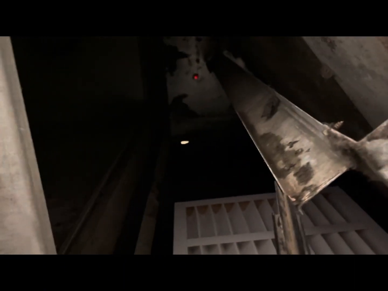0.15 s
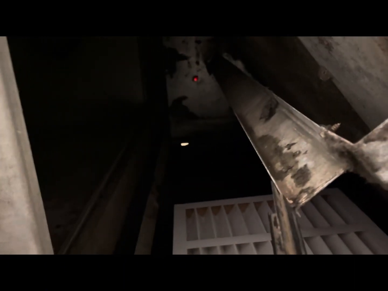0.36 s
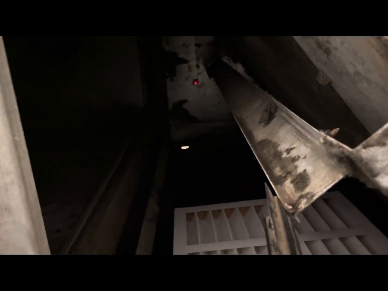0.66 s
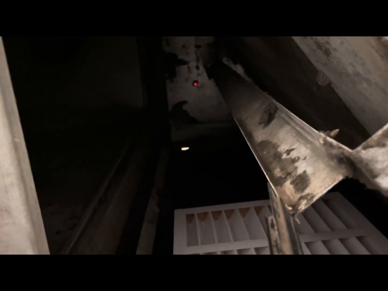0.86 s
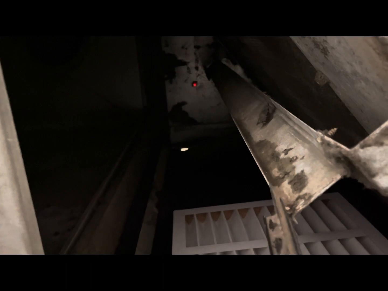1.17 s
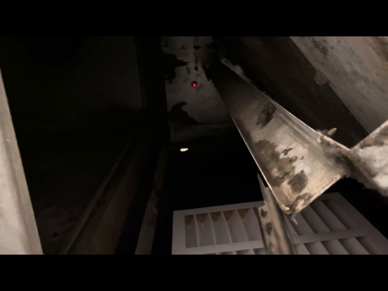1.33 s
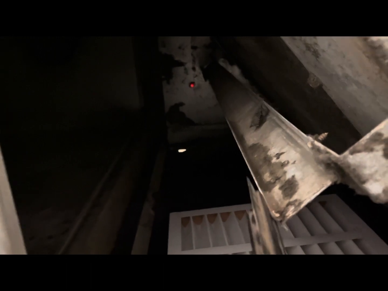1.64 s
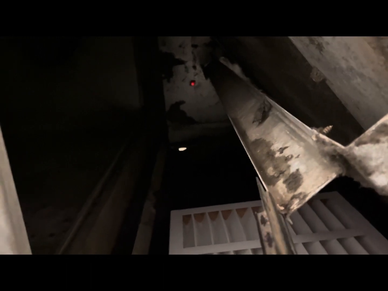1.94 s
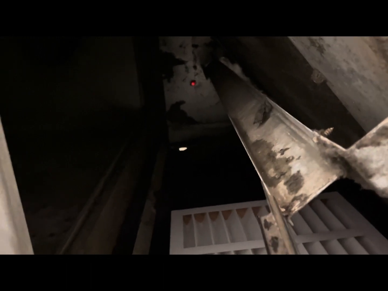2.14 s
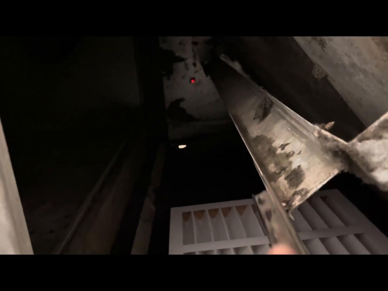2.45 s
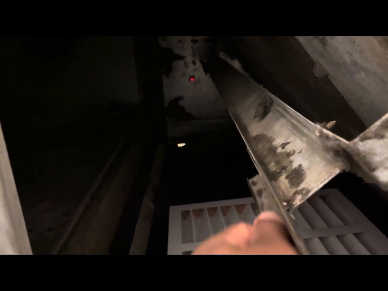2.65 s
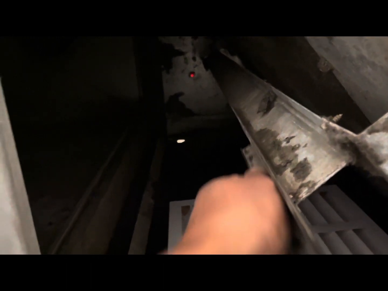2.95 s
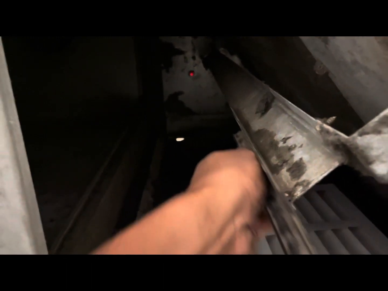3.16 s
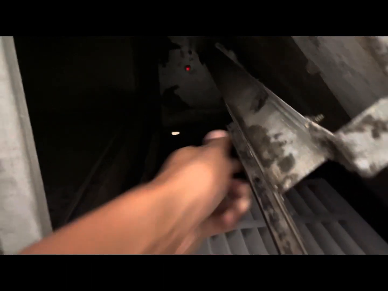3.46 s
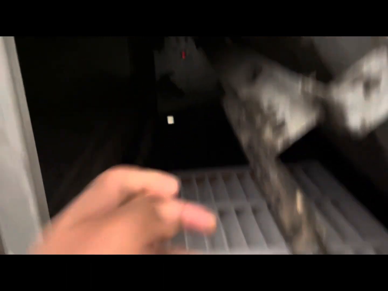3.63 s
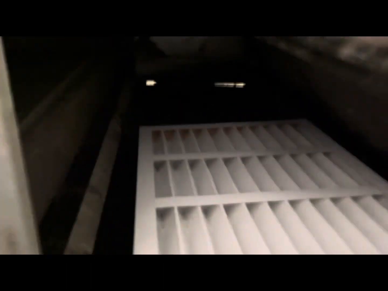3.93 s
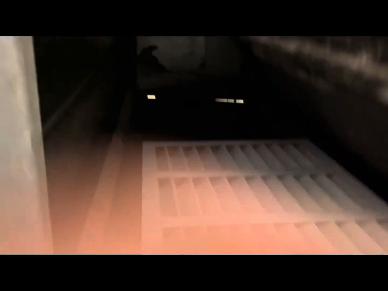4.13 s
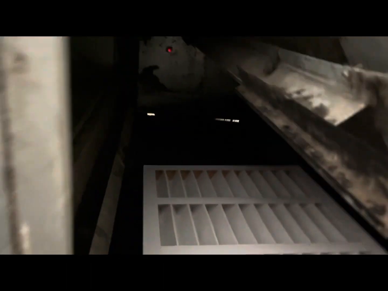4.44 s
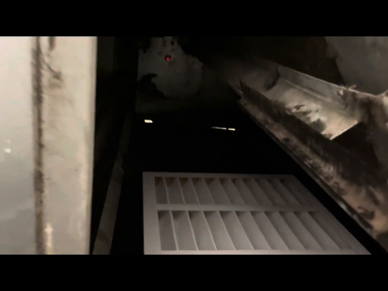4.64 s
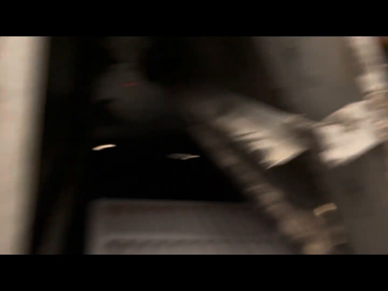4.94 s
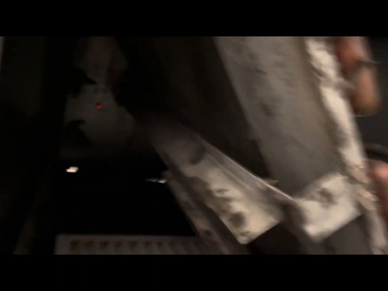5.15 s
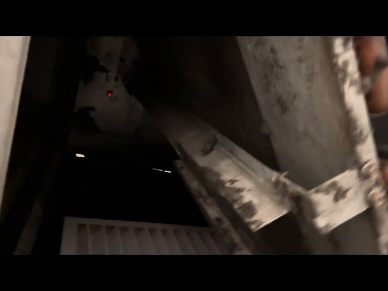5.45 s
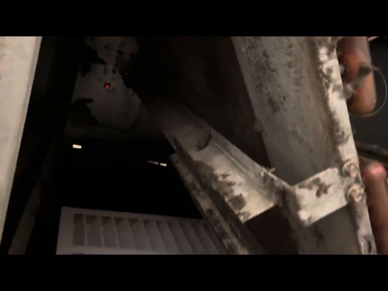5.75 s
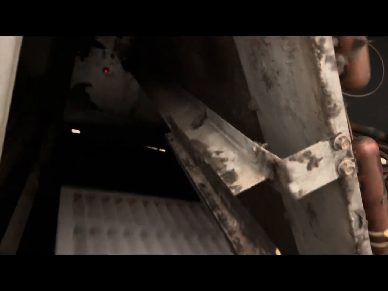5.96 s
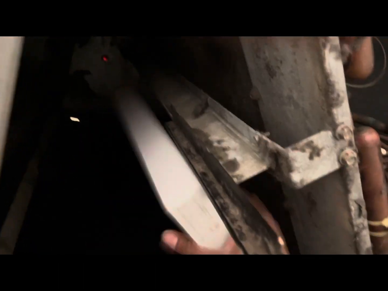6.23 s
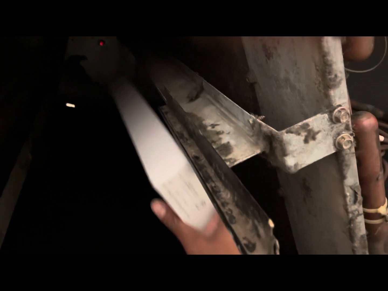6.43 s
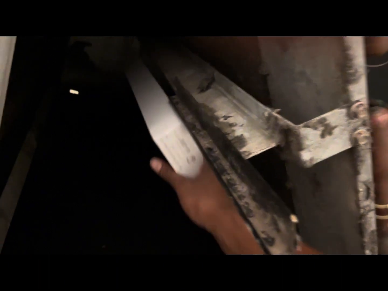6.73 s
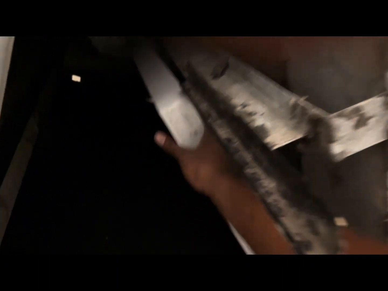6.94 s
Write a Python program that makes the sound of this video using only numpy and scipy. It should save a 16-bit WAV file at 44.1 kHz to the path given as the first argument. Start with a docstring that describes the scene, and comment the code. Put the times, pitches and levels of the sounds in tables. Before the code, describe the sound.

Inside an air-handler cabinet, a deep blower hum and duct rumble run throughout under faint air rush. Light metal scuffs and ticks come first, then a longer gritty drag of a strip on its rail ending near a sharp tick. A boomy thump follows, then a lull, then a filter frame clatters against sheet metal and slides in its track. Close handheld stereo microphone.

```python
"""Filter change in an air-handler cabinet

A hand drags a metal strip along its rail, then lifts a cardboard-framed filter that knocks on the sheet metal.
Knocks ring panel modes, ticks are band noise bursts, and friction is gritty noise through moving rings.
Behind them the blower hums as sine waves on its shaft orders, and duct air is coloured noise: rumble and rush.
A small handheld recorder with two close microphone ports listens."""
import sys
import numpy as np
from scipy import signal
from scipy.fft import rfft, irfft, next_fast_len
from scipy.io import wavfile
from scipy.ndimage import uniform_filter1d

SR = 44100
rng = np.random.default_rng(int(sys.argv[2]) if len(sys.argv) > 2 else 0)


def inscribe(sig):
    """Save sig as 16-bit PCM at rate SR to the path in sys.argv[1].

    A 1-D sig is mono; a 2-D sig holds one channel per row.
    Samples are clipped to [-1, 1] before scaling.
    """
    pcm = np.round(np.clip(np.atleast_2d(sig).T, -1, 1) * 32767)
    wavfile.write(sys.argv[1], SR, pcm.astype(np.int16))


N = 312669
T = np.arange(N) / SR


def amp(db):
    """Amplitude ratio from dB."""
    return 10 ** (np.asarray(db) / 20)


def evened(x):
    """Scales to unit rms."""
    return x / np.sqrt(np.mean(x ** 2) + 1e-20)


def peaked(x):
    """Scales the first field to unit peak."""
    return x / abs(x[0]).max()


def read(points_hz, values, hz):
    """Interpolates a curve along log frequency."""
    return np.interp(np.log(hz + 1), np.log(np.asarray(points_hz) + 1), values)


def coloured(x, spectrum):
    """Shapes x by a spectrum and returns it at unit rms."""
    size = next_fast_len(x.shape[-1])
    gain = amp(read(*np.transpose(spectrum), np.fft.rfftfreq(size, 1 / SR)))
    shaped = irfft(rfft(x, size) * gain, size)
    return evened(shaped[..., :x.shape[-1]])


def bell(hz, centre_hz, octaves):
    """A gain that falls off on both sides of a centre pitch."""
    return np.exp(-.5 * (np.log2((hz + 1) / centre_hz) / octaves) ** 2)


def drift(top_hz):
    """Slow chance curve of unit rms: 16 sines up to top_hz, over the whole scene."""
    hz = np.geomspace(top_hz / 20, top_hz, num=16)
    coarse_s = T[::64]
    waves = np.sin(2 * np.pi * (hz * coarse_s[:, None] + rng.random(16))) / np.sqrt(hz)
    return np.interp(T, coarse_s, evened(waves.sum(1)))


def wander(length, span_s):
    """Chance curve of unit rms that changes over span_s: noise averaged twice."""
    size = round(span_s * SR)
    noise = rng.standard_normal(length + 8820)
    smooth = uniform_filter1d(uniform_filter1d(noise, size), size)
    return evened(smooth)[4410:][:length]


def gritty(length, grit_db):
    """Two unrelated noises sharing one fine and coarse chance level, as in stick and slip."""
    fine = evened(uniform_filter1d(rng.standard_normal(length), size=40))
    coarse = evened(uniform_filter1d(rng.standard_normal(length), size=400))
    return amp(grit_db * (fine + 0.46 * coarse)) * rng.standard_normal((2, length))


def resonate(x, hz, width_hz):
    """A steep resonance of gain 1 that follows the curve hz: shift down, low-pass, shift back."""
    turn = np.exp(2j * np.pi * np.cumsum(hz * np.ones(x.shape[1])) / SR)
    r = np.exp(-np.pi * width_hz / SR)
    slow = signal.lfilter([(1 - r) ** 2], [1, -2 * r, r ** 2], x / turn)
    return 2 * (turn * slow).real


def close_by(pair, share):
    """A nearby source: the right-only field takes a share of the common one and keeps 0.76 of its own."""
    return np.array([pair[0], share * pair[0] + 0.76 * pair[1]])


def add(mix, start_s, sound):
    """Adds a sound into the mix at start_s, cut at the end."""
    part = mix[:, round(start_s * SR):][:, :sound.shape[1]]
    part += sound[:, :part.shape[1]]


def burst(t60_s, echo_db, click):
    """A click in the first field and two fast-dying noises, all faded by a contact plus a cabinet echo."""
    t = np.arange(SR // 8) / SR
    echo = amp(echo_db - 60 * t / .14)
    clicks = click * (t == 0) * [[1], [0]]
    return (clicks + rng.standard_normal((2, len(t)))) * (amp(-60 * t / t60_s) + echo)


# Modes of the cabinet panels and filter frame.
# Each row: pitch in Hz, strength in dB before 1/sqrt(t60), t60 in seconds before damping.
PANEL_MODES = [(81, 6, 0.56), (104, 11, 0.38), (159, 4, 0.12), (228, -1.5, 1), (239.5, -1.5, 0.19),
               (263, 1.5, 0.35), (310.3, 0, 0.4), (343, -1, 0.33), (381, -0.5, 0.28), (434.4, -9, 0.46),
               (462, -2, 0.23), (542, 1, 0.21), (578, 0.5, 0.11), (636, 4, 0.1), (722, -1, 0.11),
               (813, -3, 0.12), (891, 2, 0.26), (1060, 3.5, 0.17), (1150, 5.5, 0.17), (1250, 3, 0.11),
               (1353, 13, 0.031), (1545, 8.5, 0.039), (1600, 14, 0.032), (1780, -9, 0.11),
               (1960, 4.5, 0.063), (2060, -13, 0.067), (2260, -10, 0.16), (2760, 13.5, 0.025),
               (3200, -3, 0.039), (3600, 16, 0.1)]
MODE_SPREAD, NEIGHBOUR_DB = 0.046, -7  # chance detuning as a share of pitch, nearly symmetric


def ring(blow, centre_hz, octaves, damping, buildup_s):
    """A rattling contact drives modes near the struck pitch, each with two weaker neighbours."""
    t = np.arange(SR // 2) / SR
    hz, db, t60_s = np.transpose(PANEL_MODES)[:, :, None]
    fall = bell(hz, centre_hz, octaves) * amp(db - 60 * t / (t60_s * damping)) / np.sqrt(t60_s)
    # two fields, three tones a mode; the main tone is detuned less
    detune = rng.uniform(-1.06, 1, (2, 3, len(PANEL_MODES), 1)) * [[[.2]], [[1]], [[1]]]
    near_hz = hz * (1 + MODE_SPREAD * detune)
    weight = amp([[[0]], [[NEIGHBOUR_DB]], [[NEIGHBOUR_DB]]])
    clusters = (weight * np.sin(2 * np.pi * near_hz * t)).sum(1)
    tones = (fall * clusters).sum(1) * (1 - np.exp(-t / buildup_s))
    return peaked(signal.fftconvolve(blow, tones, axes=1))


# Filter frame and sheet metal knocks; the first three rows are soft, low blows that give body to the strip's
# scuffs. Levels are first-field peaks of each part. Each row: start in seconds, boom in dB, boom pitch in Hz,
# clack in dB, clack pitch in Hz, clack width in octaves, crack in dB, damping factor on the mode t60, contact
# t60 in seconds.
KNOCKS = [(1.335, -46, 392, -40.5, 795, 0.65, -65, 0.22, 0.35),
          (1.43, -46, 350, -40.5, 740, 0.17, -54, 0.14, 0.043),
          (1.686, -46, 600, -45, 1090, 0.34, -67, 0.1, .1),
          (3.937, -21, 109, -29, 650, 0.74, -31, 0.2, 0.048),
          (3.947, -34, 222, -23.5, 484, 0.71, -40, 0.15, 0.014),
          (4.82, -36.5, 227, -45, 600, 0.33, -69, 0.13, 0.065),
          (5.635, -41.5, 210, -33.5, 1410, 0.15, -42, 0.34, 0.07),
          (6.031, -27, 280, -18, 1300, 0.55, -27, 1, 0.032),
          (6.0323, -28.5, 504, -15.5, 590, 0.38, -50, 0.95, 0.032),
          (6.058, -29.5, 303, -30.5, 890, 0.17, -60, 0.64, 0.024),
          (6.081, -30.5, 237, -35, 500, 0.4, -65, 0.45, 0.023),
          (6.116, -32.5, 424, -47, 1500, .8, -58.5, 0.34, 0.18),
          (6.2447, -38, 530, -19, 1900, 0.51, -31, 0.16, 0.044),
          (6.3712, -28.5, 262, -18, 950, 0.83, -40, 0.085, 0.031),
          (6.425, -31, 406, -21, 960, 0.35, -43, 0.1, 0.02),
          (6.516, -36.5, 406, -24.5, 330, 0.4, -62, 0.23, 0.012),
          (6.666, -36.5, 290, -56, 600, 0.49, -49, 0.24, 0.011),
          (6.965, -32, 644, -13.5, 1600, 0.21, -16.5, 0.73, 0.035),
          (6.992, -34.5, 312, -48, 550, 0.3, -65, 0.7, 0.02),
          (7.049, -48, 310, -31, 1500, 0.3, -43, 0.7, .05)]
BOOM_LATE_S, BOOM_SHARE = 0.0059, 0.069
CLACK_EVEN_HZ = 870  # the clack below this is also fed to the right-only field
CRACK_T60_S = .03


def knock(boom_db, boom_hz, clack_db, clack_hz, clack_octaves, crack_db, damping, contact_t60_s):
    """One blow gives a frame clack, a bright crack and a late panel boom nearly unlike in the two fields."""
    blow = burst(contact_t60_s, -10.5, click=11.2)
    boom = ring(blow[[0, 0]], boom_hz, 0.6, damping, 0.014)
    out = amp(clack_db) * ring(blow, clack_hz, clack_octaves, .6 * damping, 0.00042)
    add(out, 0, tick(crack_db, 5100, 1.35, CRACK_T60_S))
    lowpass = signal.butter(N=2, Wn=CLACK_EVEN_HZ, fs=SR, output="sos")
    low = signal.sosfilt(lowpass, out[0])
    out = close_by(out, 0.041) + [[0], [.7]] * low
    add(out, BOOM_LATE_S, amp(boom_db) * close_by(boom, BOOM_SHARE))
    return out


# Small ticks of grit and metal edges.
# Each row: start in seconds, peak in dB, centre in Hz, half width in octaves.
TICKS = [(.246, -46, 11500, .4), (0.667, -39.5, 10400, 0.28), (0.925, -41, 9600, 0.26),
         (1.294, -35, 7000, 0.51), (1.43, -28.5, 3940, 0.4), (1.555, -47, 11000, 0.31),
         (1.679, -43, 3000, 0.8), (1.821, -44.5, 12500, 0.31), (2.006, -34.5, 8000, 2.4),
         (3.148, -18.5, 12600, 1), (3.363, -38, 7000, 3.1), (3.6, -48, 12000, .4), (4.591, -46, 10000, .53),
         (4.734, -40.5, 10000, .6), (5.397, -42.5, 5500, 0.86), (5.458, -46, 11000, .5),
         (6.725, -35.5, 1600, 0.31)]
TICK_T60_S = 0.02


def tick(peak_db, centre_hz, octaves, t60_s):
    """A sharp contact: a burst in one band."""
    edges_hz = np.clip(centre_hz * 2. ** np.array([-octaves, octaves]), 300, 17000)
    band = signal.butter(N=2, Wn=edges_hz, btype="band", fs=SR, output="sos")
    return amp(peak_db) * peaked(signal.sosfilt(band, burst(t60_s, -11.0, click=4.9)))


# Dry sizzle of friction. Each row: frequency in Hz, relative level in dB per Hz.
SIZZLE_SPECTRUM = [(4000, -21.5), (6500, -12.5), (8000, -3.5), (12000, -3.5), (13500, -7), (15000, 4),
                   (16000, -22)]
RING_WANDER, RING_FLICKER_DB = .015, 2  # rms; each ring slides and comes and goes as the grip shifts


def rub(rows, spectrum, grit_db, rings):
    """Gritty friction through restless rings; returns the body and its dry sizzle."""
    s, *columns = np.transpose(rows)
    t = np.arange(s[0], s[-1], 1 / SR)
    level_db, sizzle_db, ring_hz = (np.interp(t, s, c) for c in columns)
    grit = gritty(len(t), grit_db)
    body = coloured(grit, spectrum)
    for multiple, width_hz, db in rings:
        hz = multiple * ring_hz * (1 + RING_WANDER * wander(len(t), 0.034))
        flicker_db = RING_FLICKER_DB * wander(len(t), 0.017)
        body = body + amp(db + flicker_db) * evened(resonate(grit, hz, width_hz))
    fade = np.clip(np.minimum(t - s[0], s[-1] - t) / 0.0016, 0, 1)
    sizzle = amp(level_db + sizzle_db) * coloured(grit, SIZZLE_SPECTRUM) * fade
    return amp(level_db) * evened(body) * fade, sizzle


# Short scuffs of the metal strip. Each row: strongest moment in seconds, swell in seconds,
# fade in seconds, level in dB, sizzle in dB above it, ringing pitch in Hz.
SCUFFS = [(.465, 0.039, 0.039, -55.5, -14, 3280), (1.242, 0.042, 0.02, -49, -6, 3400),
          (1.3, .008, 0.069, -47.5, -7, 2900), (1.344, .05, 0.066, -45, -7.5, 3320),
          (1.421, .014, 0.012, -41, -9, 3700), (1.446, 0.022, 0.096, -55, -1, 3850),
          (1.564, 0.052, 0.13, -58.5, -6, 3660), (1.683, 0.05, 0.02, -56.5, -8, 3600),
          (2.03, 0.019, 0.041, -60, -4, 3240), (2.249, 0.037, 0.19, -59, 1.5, 3560),
          (3.435, 0.09, 0.046, -65, 13.5, 3200)]
SCUFF_EDGE_DB = -19.5  # at both ends, re strongest moment


def scuff(strongest_s, swell_s, fade_s, level_db, sizzle_db, ring_hz):
    """A short stroke: friction rows that swell to the strongest moment and fade."""
    steps = [(-swell_s, SCUFF_EDGE_DB), (0, 0), (fade_s, SCUFF_EDGE_DB)]
    return [(strongest_s + step_s, level_db + db, sizzle_db, ring_hz) for step_s, db in steps]


# Long drag of the strip on its rail.
# Each row: time in seconds, level in dB, sizzle in dB above it, ringing pitch in Hz.
DRAG = [(2.34, -76, 1, 3500), (2.41, -54.5, 3.5, 3700), (2.655, -56.5, 3.5, 3400),
        (2.672, -48.5, -1.5, 3370), (2.74, -47, -2, 3500), (2.77, -44.5, -3, 4000), (2.865, -53, 4, 3600),
        (2.9, -52.5, 3, 3050), (2.98, -50, 8, 2930), (3.05, -51.5, 7, 2980), (3.14, -53, 4, 2870),
        (3.245, -53.5, 1, 2870), (3.29, -76, 5, 2950)]
# Strip friction. Each row: frequency in Hz, relative level in dB per Hz.
STRIP_SPECTRUM = [(400, -24), (700, -6.5), (1500, -12.5), (1950, -0.5), (2350, -2.5), (3200, 1.5),
                  (4200, 0), (5100, -1), (5900, -9.5), (6800, -5.5), (8500, -11), (12000, -20)]
# Rings of the strip. Each row: multiple of the ringing pitch, width in Hz, mean level in dB.
STRIP_RINGS = [(1, 300, -7), (1.2, 500, -19), (1.58, 600, -11)]


def add_strip(mix):
    """Metal on metal: one long drag and the scuffs, bright friction over the strip's rings."""
    for rows in [DRAG] + [scuff(*row) for row in SCUFFS]:
        body, sizzle = rub(rows, STRIP_SPECTRUM, grit_db=1.5, rings=STRIP_RINGS)
        add(mix, rows[0][0], body + sizzle)


# Cardboard frame sliding in its track.
# Each row: time in seconds, level in dB, sizzle in dB above it, ringing pitch in Hz.
SLIDE = [(4.3, -67, -8, 1440), (4.65, -59.5, -21, 1477), (5.1, -66, -23, 1440), (5.62, -68, 1, 1440),
         (5.629, -53, 0, 1430), (5.645, -46.5, -8, 1460), (5.75, -69, -1, 1410), (5.775, -53, -11, 1340),
         (5.9, -62.5, -4, 1400), (5.97, -52, -23, 1310), (6.14, -46, -13, 1370), (6.235, -56.5, -11, 1370),
         (6.28, -53.5, -25, 1380), (6.35, -56, -22, 1400), (6.441, -45.5, -17, 1370),
         (6.5, -51.5, -8, 1290), (6.59, -47.5, -14, 1530), (6.62, -49.5, -5, 1200),
         (6.69, -46.5, -15, 1370), (6.712, -49.5, -8, 1440), (6.728, -49.5, -13, 1500),
         (6.76, -46.5, -17, 1250), (6.81, -47, -20, 1620), (6.84, -49, -10, 1460), (6.88, -43, -13, 1460),
         (6.94, -49, -9, 1780), (6.96, -48, -19, 1610), (7.09, -50, -7, 1620)]
# Cardboard friction. Each row: frequency in Hz, relative level in dB per Hz.
CARD_SPECTRUM = [(300, -1.5), (700, -10.5), (1100, -6), (1450, -5.5), (2150, -9.5), (2800, -11.5),
                 (4200, -20), (5200, -20.5), (6000, -27.5), (7500, -24), (9000, -39)]
# Rings of the frame. Each row: multiple of the ringing pitch, width in Hz, mean level in dB.
CARD_RINGS = [(.68, 250, -18), (1, 220, -11), (1.2, 250, -16), (1.45, 220, -13)]


def add_card_frame(mix):
    """Cardboard on its track: duller friction with lower rings, close by."""
    body, sizzle = rub(SLIDE, CARD_SPECTRUM, grit_db=2.0, rings=CARD_RINGS)
    add(mix, SLIDE[0][0], close_by(body, 0.015) + sizzle)


SHAFT_HZ, MOTOR_HZ, MAINS_HZ = 18.462, 29.15, 60
MOTOR_DB, BOOM_WAVER_DB = -53, 2  # rms
# Blower shaft orders. Each row: multiple of the shaft rate, mean level in dB rms.
SHAFT_ORDERS = [(2, -61), (4, -43), (5, -48), (6, -56), (7, -57), (8, -50), (9, -56), (10, -64)]
# Magnetic buzz. Each row: multiple of mains, mean level in dB rms.
MAINS_BUZZ = [(2, -46), (6, -63)]
# Third order booming in the cabinet. Each row: time in seconds, level in dB rms before waver.
THIRD_ORDER_BOOM = [(0, -29.5), (1.16, -27.5), (1.6, -31), (2.5, -28), (3.8, -31.5), (4.7, -28.5),
                    (4.8, -27.5), (4.86, -41), (4.93, -34.5), (5.1, -30.5), (5.6, -29.5), (7.09, -29)]


def blower():
    """Shaft orders, motor unbalance and magnetic buzz as nearly steady tones."""
    turns = SHAFT_HZ * T + 0.0029 * drift(2.1)
    boom_db = np.interp(T, *np.transpose(THIRD_ORDER_BOOM)) + BOOM_WAVER_DB * drift(22)
    out = amp(boom_db) * np.sin(2 * np.pi * 3 * turns)
    for order, db in SHAFT_ORDERS:
        out += amp(db + 0.64 * drift(2.5)) * np.sin(2 * np.pi * (order * turns + rng.random()))
    for multiple, db in MAINS_BUZZ:
        cycles = multiple * MAINS_HZ * T + rng.random()
        out += amp(db + 3.0 * drift(2.45)) * np.sin(2 * np.pi * cycles)
    out += amp(MOTOR_DB) * np.sin(2 * np.pi * MOTOR_HZ * T)
    return np.sqrt(2) * np.array([out, 0 * out])  # sqrt(2): rms to peak


# Duct rumble. Each row: frequency in Hz, relative level in dB per Hz.
RUMBLE_SPECTRUM = [(20, -36), (44, -11), (52, -3.5), (62, 2), (68, -16.5), (79, -0.5), (105, -5.5),
                   (118, -1.5), (133, -11), (160, -14.5), (250, -24), (400, -26.5), (470, -33.5),
                   (900, -58)]
# Air rush. Each row: frequency in Hz, relative level in dB per Hz.
RUSH_SPECTRUM = [(300, -11.5), (600, 3), (900, 1), (1600, -2), (2300, -7), (3000, -7.5), (4400, -11.5),
                 (5500, -15), (8000, -17.5), (10000, -18), (12500, -21.5), (14000, -47), (14700, -40.5),
                 (15500, -45)]
# Faint cabinet resonances in the rush. Each row: pitch in Hz, width in Hz, level in dB re rush.
WHISTLES = [(745.5, 60, -14), (3256, 120, -19.5), (4290, 140, -22.5), (4570, 48, -25.5), (4590, 750, -26)]
RUMBLE_DB, RUSH_DB = -35.5, -58.5  # rms; rush is the mean without whistles


def air():
    """Turbulent air: a low rumble in the duct resonances and a smooth rush."""
    rumble = amp(RUMBLE_DB) * coloured(rng.standard_normal((2, N)), RUMBLE_SPECTRUM)
    eddies = gritty(N, 0.91)
    rush = coloured(eddies, RUSH_SPECTRUM)
    for hz, width_hz, db in WHISTLES:
        rush = rush + amp(db) * evened(resonate(eddies, hz, width_hz))
    return rumble + amp(RUSH_DB + 0.83 * drift(19)) * rush


def scene():
    """Two sound fields: the first reaches both ports, the second only the right one."""
    mix = blower() + air()
    add_strip(mix)
    add_card_frame(mix)
    for start_s, *blow in KNOCKS:
        add(mix, start_s, knock(*blow))
    for start_s, *touch in TICKS:
        add(mix, start_s, tick(*touch, TICK_T60_S))
    return mix


# Port pair. Each row: frequency in Hz, likeness 0-1, left phase lead in radians, left minus right in dB.
PORTS = [(60, .997, 0, -1.4), (150, .93, 0, -.3), (350, .6, 0, -.3), (900, .3, .3, -.8),
         (2300, .45, .6, 2.3), (3500, .5, 1, 3), (5000, .4, .5, 3), (6000, .4, -1.2, 2),
         (7000, .5, -1.7, 1.5), (7700, .88, -2.95, .5), (8200, .995, -3.12, 0), (9000, .995, -3.17, 0),
         (9700, .85, -3.8, 0), (11500, .72, -5.1, 0), (12400, .93, -6.1, 0), (13000, .998, -6.28, 0)]
# Microphone response. Each row: frequency in Hz, gain in dB.
MIC_RESPONSE = [(20, -0.5), (13000, 0), (14500, -9), (16000, -26)]
# Recorder turning in the hand. Each row: time in seconds, added left minus right in dB.
TURN = [(0, 0), (3.2, -0.26), (3.7, .3), (7.09, .5)]
EDGE_HZ = 16200


def record(dry):
    """The two ports share part of the field with a phase lead; then the band limit."""
    size = next_fast_len(N + 4096)
    hz = np.fft.rfftfreq(size, 1 / SR)
    port_hz, *columns = np.transpose(PORTS)
    same, lead, tilt_db = (read(port_hz, c, hz) for c in columns)
    same = np.clip(same, 0, 1)
    common, right_only = rfft(dry, size) * amp(read(*np.transpose(MIC_RESPONSE), hz))
    left = common * np.exp(.5j * lead) * amp(tilt_db / 2)
    right = same * common + np.sqrt(1 - same ** 2) * right_only
    right = right * np.exp(-.5j * lead) * amp(-tilt_db / 2)
    ports = irfft(np.array([left, right]), size)[:, :N]
    turn_db = np.interp(T, *np.transpose(TURN))
    ports = ports * amp([turn_db / 2, -turn_db / 2])
    lowpass = signal.firwin(511, EDGE_HZ, window=("kaiser", 9), fs=SR)
    return signal.oaconvolve(ports, lowpass[None], "same")


dry = scene()
out = record(dry)
inscribe(out)
```